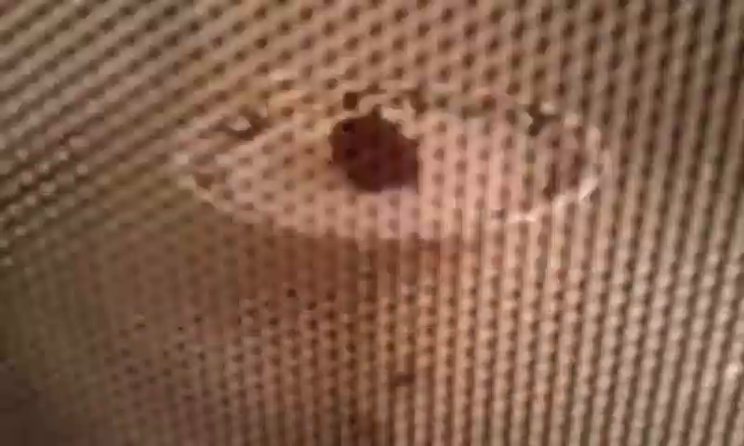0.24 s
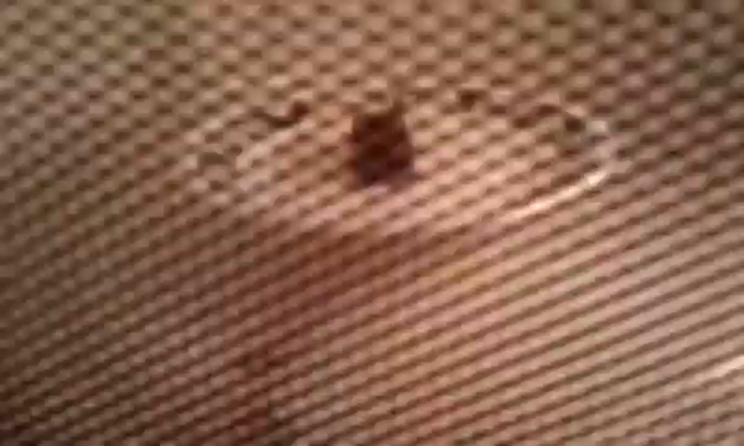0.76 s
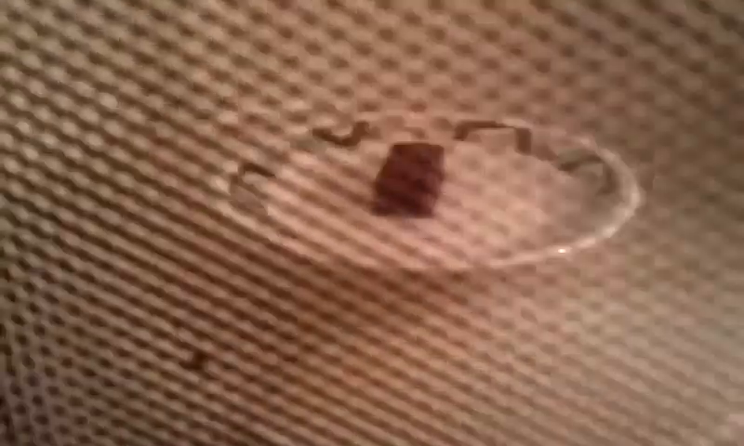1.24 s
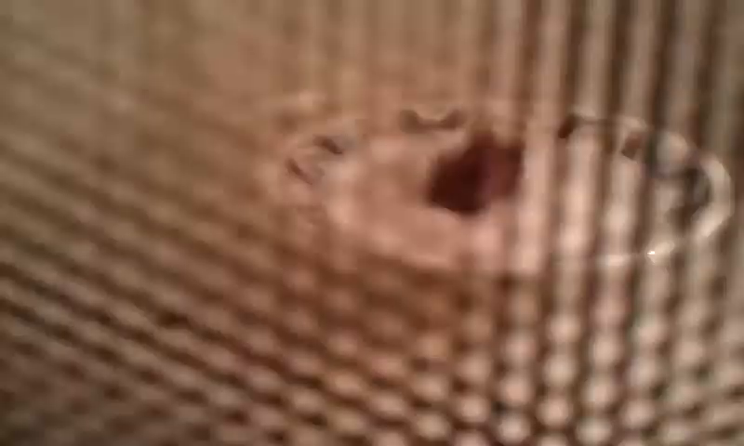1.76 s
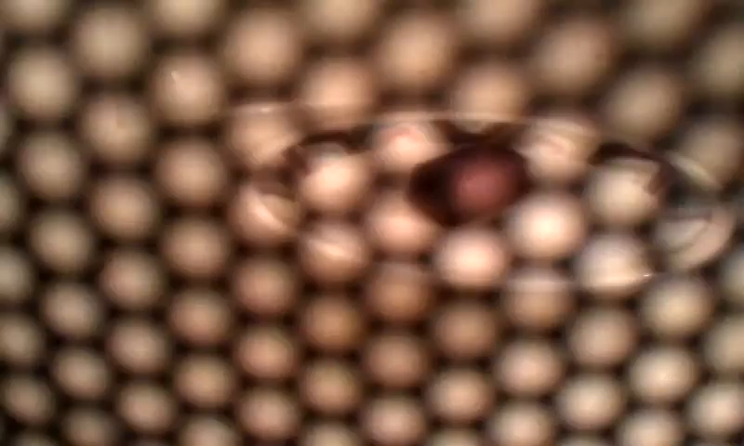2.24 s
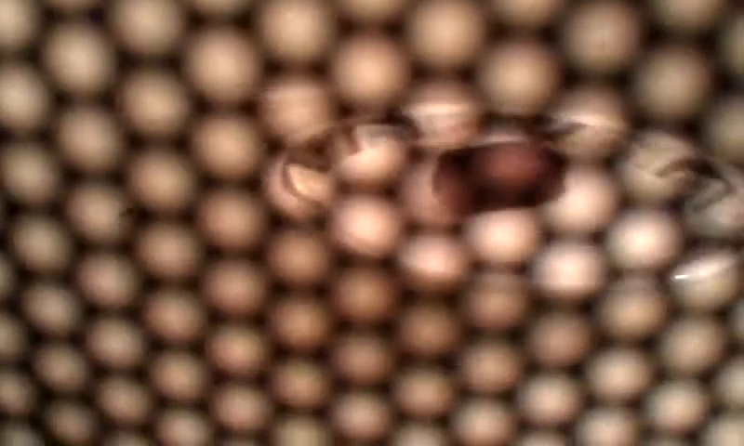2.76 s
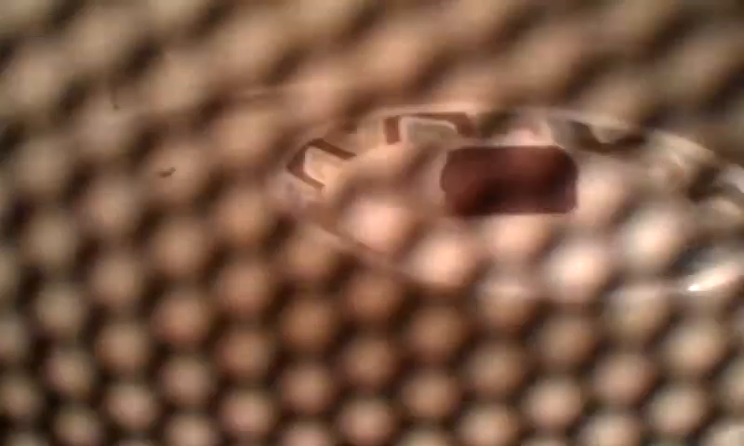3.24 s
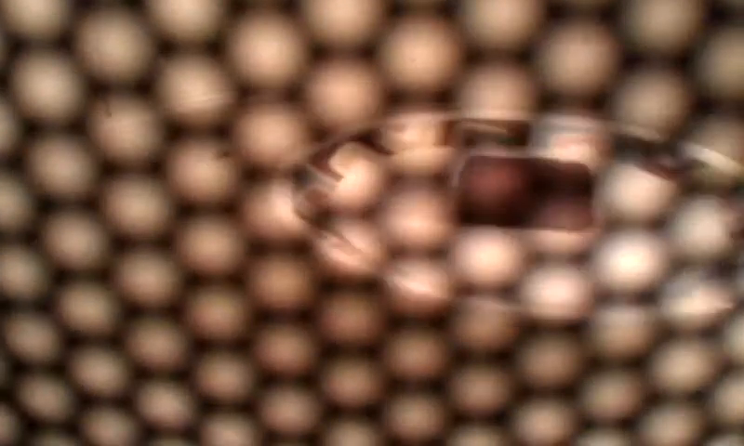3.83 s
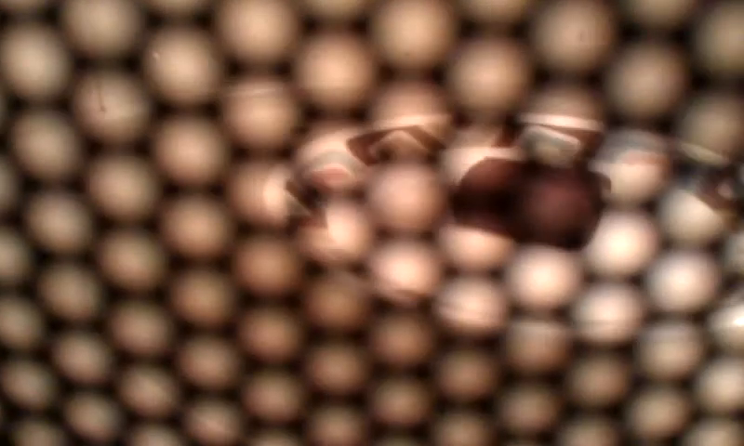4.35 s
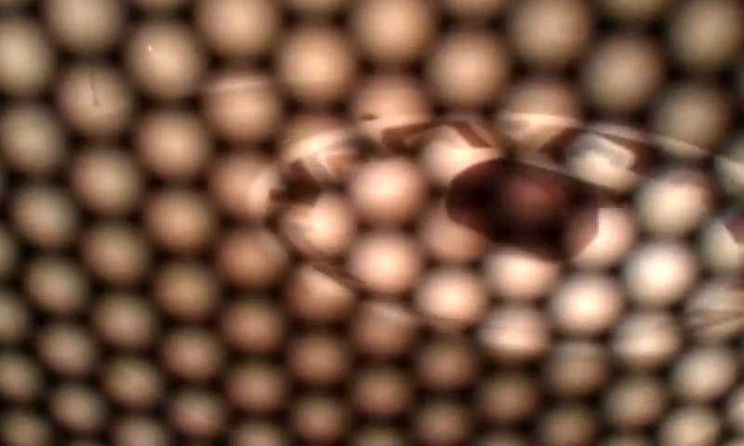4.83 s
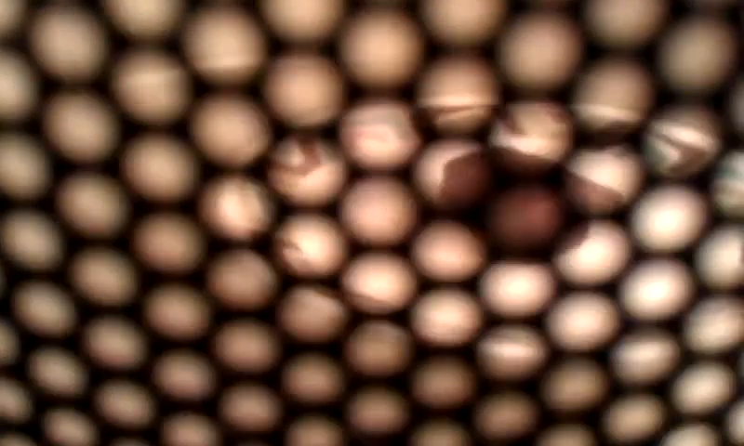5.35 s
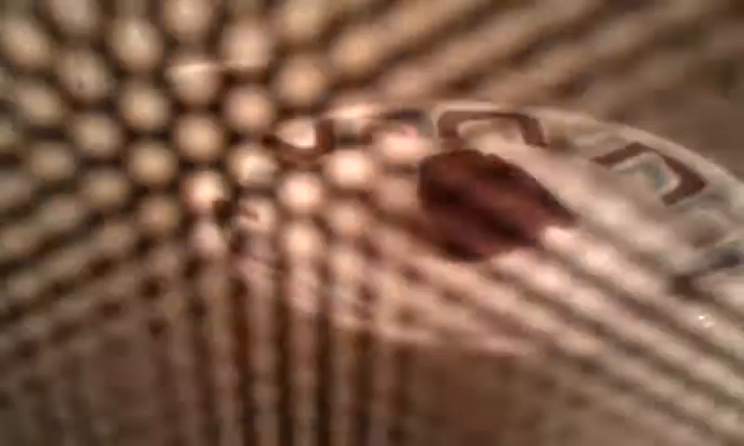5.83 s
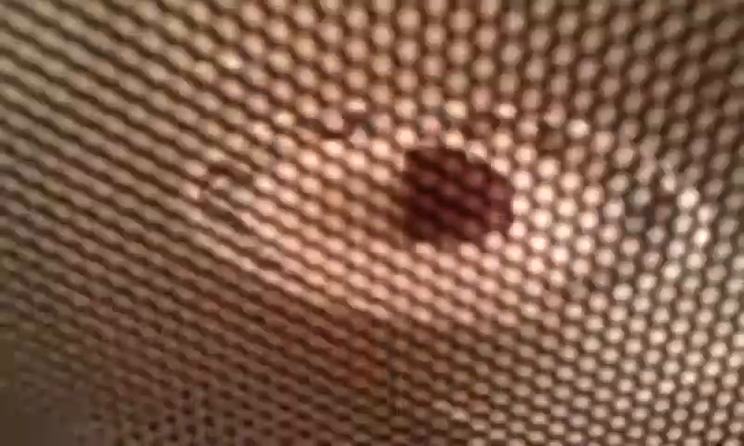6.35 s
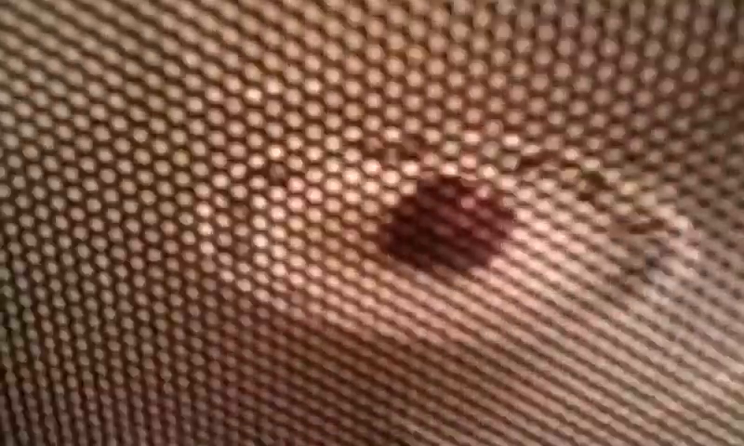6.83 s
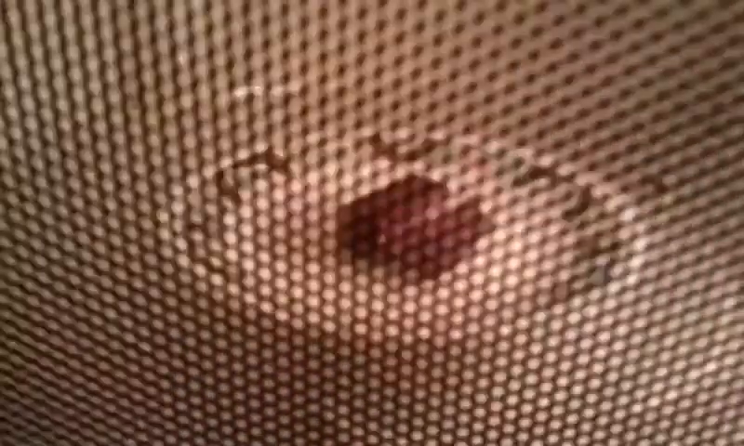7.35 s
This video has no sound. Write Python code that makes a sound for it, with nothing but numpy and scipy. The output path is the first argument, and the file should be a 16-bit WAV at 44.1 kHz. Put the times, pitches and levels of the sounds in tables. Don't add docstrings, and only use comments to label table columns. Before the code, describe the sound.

Close, constant mains hum and airy fan noise from a running microwave oven, broken by brief bright turntable scrapes and tiny clicks.

```python
import sys
import numpy as np
from scipy import signal
from scipy.fft import rfft, irfft, next_fast_len
from scipy.io import wavfile
from scipy.ndimage import uniform_filter1d

SR = 44100
rng = np.random.default_rng(int(sys.argv[2]) if len(sys.argv) > 2 else 0)


def amplitude_ratio(level_db):
    exponent = np.asarray(level_db, float) / 20
    return 10 ** exponent


def inscribe(sig):
    pcm = np.round(np.clip(np.atleast_2d(sig).T, -1, 1) * 32767)
    wavfile.write(sys.argv[1], SR, pcm.astype(np.int16))


N = 334278
T = np.arange(N) / SR
MAINS_HZ = 60.014


def curves(table):
    s, *columns = np.transpose(table)
    return [np.interp(T, s, c) for c in columns]


def colour(table, hz):
    return np.interp(np.log(hz), np.log(np.array(table)[:, 0]), np.array(table)[:, 1])


def noise(table, peaks=(), count=N):
    size = next_fast_len(count, True)
    hz = np.fft.rfftfreq(size, 1 / SR) + 1
    db = colour(table, hz)
    for centre, width, gain in peaks:
        db = db + gain / (1 + (2 * (hz - centre) / width) ** 2)
    inside = (hz < 1.05 * table[-1][0]) * (hz > .9 * table[0][0])
    x = irfft(rfft(rng.standard_normal(size)) * amplitude_ratio(db) * inside, size)[:count]
    return x / x.std()


def hump(hz, width):
    return [(hz / width ** 2, -30), (hz / width, -6), (hz, 0), (hz * width, -8), (hz * width ** 2, -30)]


def walk(rate):
    k = int(SR / rate)
    held = np.repeat(rng.standard_normal(N // k + 1), k)
    return 1.42 * uniform_filter1d(uniform_filter1d(held, k), k)[:N]


def tone(turns, db):
    return np.sqrt(2) * amplitude_ratio(db) * np.sin(2 * np.pi * turns)


# time in seconds, then position towards the door, sideways and upwards (-1 to 1).
HAND_PATH = [(0.05, -0.86, 0.84, -0.37), (0.5, -0.53, -0.26, 0.48), (0.95, -0.94, -0.79, -0.021),
             (1.4, -0.4, -1.2, 0.34), (1.8, -0.031, -0.57, 0.64), (2.2, 0.55, -0.75, -0.068),
             (2.7, 0.46, -0.93, -0.27), (3.1, 0.56, -0.8, -0.67), (3.5, 0.93, 0.0073, -0.6),
             (4.0, 0.58, 0.28, -0.28), (4.5, 0.81, 0.96, 0.35), (5.0, 0.67, 0.94, 0.75),
             (5.5, 0.67, 0.54, 0.44), (5.9, -0.39, -0.0, 0.22), (6.3, -0.93, 0.87, -0.22),
             (6.7, -0.38, 0.66, -0.53), (7.1, -0.69, 0.4, 0.11), (7.55, -0.61, -0.47, 0.31)]


def field(gains_db):
    s, *place = np.transpose(HAND_PATH)
    return np.interp(T, s, np.dot(gains_db, place))


# multiple of the mains, mean level in dB.
HUM_LINES = [(1, -53.8), (2, -19.2), (3, -49.2), (4, -41.9), (6, -37.8), (7, -43.6), (8, -39.2), (9, -50.8),
             (10, -40.2), (11, -47.4), (12, -53.6), (18, -51.9), (20, -49.7), (22, -46.7), (23, -53.5),
             (24, -48.5), (28, -57.3), (30, -55.9), (36, -59.6), (54, -63.8), (55, -64.9), (83, -63.3),
             (125, -68.1), (144, -65.1), (145, -65.3), (142, -67), (148, -67.9), (150, -68), (158, -67),
             (160, -62.5)]
# time in seconds, level in dB.
HUM_SWAY = [(0.03, -20), (0.4, -18.9), (0.8, -19.5), (1.1, -19.1), (1.75, -18), (2.05, -20), (2.3, -19.2),
            (2.6, -19.4), (2.9, -21), (3.2, -20.5), (3.35, -18), (3.8, -18), (4.02, -20), (4.12, -18.7),
            (5.8, -19), (6.1, -19), (6.6, -19.9), (7.55, -20)]
HUM_FIELD = {1: (2.2, 2.6, 2.5), 4: (4.1, -1.4, -.8), 6: (0.091, 3.2, -1.8), 7: (.1, -.8, 3.5),
             8: (-0.96, 0.99, 3.5), 10: (2.1, -0.19, -1.6), 20: (2.6, .8, -.4), 22: (.2, 1.6, -.3),
             24: (1.3, 2.3, -.2), 11: (-.5, .3, .1), 142: (-5, 3, -6), 144: (-4, 1.5, -1.5),
             145: (1.5, 0, -.5), 148: (-5, -.5, 1.5), 150: (-5, 1.5, -3), 158: (-1.5, -5, .3),
             160: (-6, -2.5, -.5)}


def transformer():
    out = 0
    for k, db in HUM_LINES:
        start = rng.random() * (1 if k % 2 else .25) * (k != 10)
        if k == 2:
            level = curves(HUM_SWAY)[0] + .35 * walk(6)
        elif k in HUM_FIELD:
            level = db - 0.27 + field(HUM_FIELD[k]) + 0.7 * walk(1.66)
        else:
            level = db + (2.5 + k / 80) * walk(1.1) - 1 - k / 100
        out = out + tone(k * MAINS_HZ * T + start, level)
    return out


# frequency in Hz, level in dB per line.
BUZZ = [(700, -58), (1200, -55), (1900, -61), (2300, -70), (3400, -66), (5500, -73), (7500, -70),
        (8600, -67), (9700, -71), (11000, -88)]


def laminations():
    k = np.setdiff1d(np.arange(13, 186), np.array(HUM_LINES)[:, 0]).astype(int)
    place = (MAINS_HZ * T % 1) * 4096
    out = 0
    for _ in range(3):
        lines = np.zeros(2049, complex)
        phasors = rng.standard_normal(len(k)) + 1j * rng.standard_normal(len(k))
        lines[k] = amplitude_ratio(colour(BUZZ, k * MAINS_HZ) - 7.5) * phasors
        cycle = irfft(lines) * 2048
        out = out + amplitude_ratio(4 * walk(.8)) * np.interp(place, np.arange(4097), np.append(cycle, cycle[0]))
    return out


# time in seconds, rotation in Hz.
FAN_SHAFT = [(0, 50.13), (2.4, 50.14), (3.6, 50.21), (4.4, 50.1), (4.8, 49.96), (5.3, 50.08), (7.58, 50.13)]
BLADES = {4: (-33.5, 0.7, -2.5, 0.9), 8: (-43.5, 0.7, -2.5, 2), 18: (-44.5, 0.2, 0.3, -2.4),
          12: (-46, -2.2, -4, -7.5)}
# shaft multiple, mains multiple added, level in dB.
WHIR = [(1, 0, -63), (2, 0, -60), (4, 2, -52), (17, 2, -51), (18, 2, -49), (18, -2, -51), (16, 0, -60)]
# time in seconds, level change in dB.
FLOW = [(0, 0.2), (.9, 1.2), (1.5, 0.1), (2.0, -1.4), (2.6, -0.6), (3.1, 0), (3.8, 1.1), (4.4, 0.4),
        (5.0, -0.1), (5.9, -0.8), (6.5, .2), (7.58, -0.3)]


def fan():
    turns = np.cumsum(curves(FAN_SHAFT)[0]) / SR
    beat_s = 3.14
    meet = 10 * MAINS_HZ * beat_s - 12 * turns[int(beat_s * SR)]
    out = 0
    for k, (db, *gains) in BLADES.items():
        start = meet if k == 12 else rng.random()
        level = db + field(gains) + walk(9) + (k > 4) * 2.2 * curves(FLOW)[0]
        out = out + tone(k * turns + start, level)
    for k, m, db in WHIR:
        out = out + tone(k * turns + m * MAINS_HZ * T + rng.random(), db + 2.5 * walk(1.5))
    return out


# time in seconds, level in dB.
SWISHES = [(0.125, -46), (0.564, -45.5), (0.788, -46), (1.377, -56), (1.581, -47), (1.786, -48),
           (2.165, -48), (2.34, -49), (2.454, -50), (2.744, -53), (3.213, -43.5), (3.288, -45),
           (4.056, -50), (4.31, -47.7), (4.475, -47), (4.605, -46), (4.789, -48.7), (4.904, -47),
           (5.951, -43.5), (6.041, -46), (6.166, -49), (6.341, -46), (6.455, -45), (6.63, -44.5),
           (6.755, -44.5), (6.904, -42.5), (7.104, -49), (7.204, -44), (7.363, -45), (7.543, -40.5)]
# frequency in Hz, level in dB per Hz.
ROLLING = [(1500, -23), (3500, -5), (5500, -5), (6500, -6.5), (8000, 1.5), (9800, -6.5), (11000, -11),
           (15500, -27)]


def swishes():
    power = amplitude_ratio(-55.5 + 1.8 * walk(9)) ** 2
    for s, db in SWISHES:
        power = power + amplitude_ratio(db) ** 2 * np.exp(-((T - s) / 0.027) ** 2)
    return np.sqrt(power) * amplitude_ratio(2.5) * noise(ROLLING)


# loudest moment in seconds, level in dB, rise in seconds, T60 in seconds, centre in Hz.
DRAGS = [
    (1.1, -49, 0.12, 0.8, 12000),
    (1.15, -32.5, 0.005, 0.4, 7800),
    (1.152, -38, .006, .4, 4000),
    (1.235, -42, .006, 0.24, 10000),
    (2.058, -45, .014, .2, 14500),
    (3.17, -48, .02, 0.48, 12000),
    (5.8, -52, .014, .4, 14500),
    (5.818, -28.5, .012, 0.14, 7600),
    (5.843, -35, .01, .08, 7000),
    (7.55, -43, 0.054, .5, 8000),
]
# frequency in Hz, level in dB per Hz.
PLATE = [(700, -12), (1200, -2.5), (3000, -3), (5500, -8), (6500, -14)]


def scrapes():
    plate = noise(PLATE)
    out = 0
    for s, db, rise, t60, hz in DRAGS:
        swell = np.exp(-((T - s) / rise) ** 2)
        decay = amplitude_ratio(-60 * np.abs(T - s) / t60)
        shape = np.where(T < s, swell, decay)
        out = out + shape * amplitude_ratio(db) * (noise(hump(hz, 1.31)) + amplitude_ratio(-6.5) * plate)
    return out


# time in seconds, peak level in dB, centre in Hz, spread as a frequency ratio.
TICKS = [(1.145, -17, 8300, 1.23), (1.147, -22, 6000, 1.1), (1.2316, -23, 8200, 1.4),
         (1.929, -29, 5500, 1.3), (2.0527, -23, 9200, 1.25), (2.0844, -40, 14000, 1.15),
         (2.9721, -27, 5590, 1.6), (3.9414, -27.5, 8100, 1.2), (5.5333, -21.5, 9300, 1.08),
         (5.5335, -25, 7600, 1.08), (5.5337, -29, 4970, 1.1), (5.838, -18, 1400, 1.4),
         (5.5333, -39, 13500, 1.2), (5.7823, -32, 8330, 1.3), (5.8117, -19, 8000, 0.84),
         (6.7386, -31, 7850, 1.3), (7.1886, -31, 8600, 1), (0.4143, -26.5, 4000, 1.12)]


def ticks():
    out = np.zeros(N)
    age = np.arange(2048) / SR
    envelope = amplitude_ratio(-60 * age / 0.015) * np.minimum(age / 0.0023, 1)
    for s, db, hz, spread in TICKS:
        tick = noise(hump(hz, max(spread, 1.05)), count=len(age)) * envelope
        i = int(s * SR)
        out[i:i + len(age)] += amplitude_ratio(db - 1.3) * tick / np.abs(tick).max()
    return out


# time in seconds, frequency in Hz, level in dB, length in seconds.
BUMPS = [
    (1.51, 322, -38, 0.031),
    (3.28, 50, -48, .06),
    (3.75, 56, -52, .1),
    (.02, 40, -47, .04),
]


def bumps():
    return sum(tone(hz * T, db) * np.exp(-((T - s) / length) ** 2) for s, hz, db, length in BUMPS)


# frequency in Hz, level in dB per Hz.
BODY = [(20, -85), (45, -86), (90, -72.5), (150, -67), (300, -67.5), (500, -64.5), (700, -69), (1100, -65),
        (1500, -68), (1900, -71.5), (2400, -93)]
VENTS = [(1500, -93), (1900, -69.5), (2400, -72), (3200, -76), (3800, -75), (4600, -81.5), (5500, -92)]
GRILLE = [(4000, -86), (4700, -79), (6400, -78), (7200, -104)]
HISS = [(5800, -94), (6600, -73), (8000, -71), (9500, -78.5), (11000, -89), (12500, -93), (16000, -94.5)]
# centre in Hz, width in Hz, gain in dB.
CABINET = [(211, 19, 6), (259, 8.1, 2.5), (378, 14, -5), (406, 20, 8.5), (557, 9.8, 4.5), (654, 16, -0.5),
           (800, 60, -0.5), (873, 40, -0.5), (1040, 98, 0.5), (1348, 37, 3.5), (1400, 32, -8),
           (1620, 74, 1.5), (1997, 55, -9)]


def air():
    flow = curves(FLOW)[0]
    pulse = 1 + 0.11 * np.sin(4 * np.pi * MAINS_HZ * T)
    body_db = -33 + field((0.15, -0.5, -0.2)) + flow + 0.57 * walk(7)
    vents_db = -41.5 + field((1.5, -0.45, -.2)) + 0.28 * flow + 0.46 * walk(9.9)
    grille_db = -47 + field((-1.9, -0.9, -2))
    hiss_db = -46 + field((-2.2, -1.9, -1.8)) + .6 * walk(14)
    body = amplitude_ratio(body_db) * noise(BODY, CABINET) * pulse
    vents = amplitude_ratio(vents_db) * noise(VENTS, CABINET) * pulse ** .2
    mesh = (amplitude_ratio(grille_db) * noise(GRILLE) + amplitude_ratio(hiss_db) * noise(HISS)) * pulse ** 0.31
    return body + vents + mesh


def scene():
    oven = transformer() + laminations() + fan() + swishes() + scrapes() + ticks() + bumps() + air()
    return oven[None]


# frequency in Hz, level in dB.
BAND_FLOOR = [(9600, -52), (10700, -48.5), (11400, -48.5), (12000, -47.5), (13500, -49), (15500, -50)]
# time in seconds, dB against that band's level.
MESH_FLOOR = [(0, -7), (3.7, -6), (4.1, -3.5), (5.5, -3.5), (5.7, -1.6), (7.58, -1.6)]


def treble_gaps(x):
    how = dict(fs=SR, window="cosine", nperseg=2048, noverlap=1024)
    hz, s, z = signal.stft(x, **how)
    bands = np.abs(z[:1024].reshape(32, 32, -1)) ** 2
    centre = hz[16:1024:32, None]
    hiss = bands[10:13].mean((0, 1))
    rise_db = 10 * np.log10(signal.medfilt(hiss, 21) / np.median(hiss))
    scatter_db = 1.3 * rng.standard_normal(bands.shape[::2])
    need = amplitude_ratio(colour(BAND_FLOOR, centre) - 21.5 + .7 * rise_db + scatter_db) ** 2
    z[:1024] *= np.repeat((bands.sum(1) > need) | (centre < 9700), 32, axis=0)

    mesh = (hz > 5200) & (hz < 6850)
    power = np.abs(z[mesh]) ** 2
    nearby = signal.convolve2d(power, np.ones((4, 2)) / 8, "same", "symm")
    floor = amplitude_ratio(np.interp(s, *np.transpose(MESH_FLOOR)) + .6 * rng.standard_normal(len(s))) ** 2
    z[mesh] *= nearby > floor * signal.medfilt(np.mean(power, axis=0), 21)

    top = np.abs(z[hz > 9750]) ** 2
    around = uniform_filter1d(top, size=48, axis=0)
    nearby = signal.convolve2d(top, np.ones((4, 1)) / 4, "same", "symm")
    z[hz > 9750] *= nearby > amplitude_ratio(-2) ** 2 * around
    z[hz > 15800] = 0
    return signal.istft(z, **how)[1][:N]


def top_cut(x):
    return signal.sosfilt(signal.butter(12, 15700, fs=SR, output="sos"), x)


def record(dry):
    mix = treble_gaps(dry[0])[None]
    return top_cut(mix)


dry = scene()
out = record(dry)
inscribe(out)
```